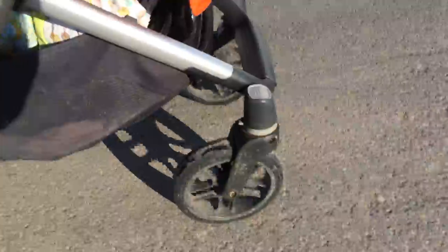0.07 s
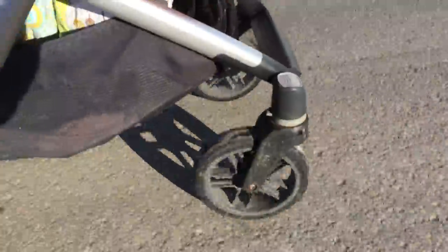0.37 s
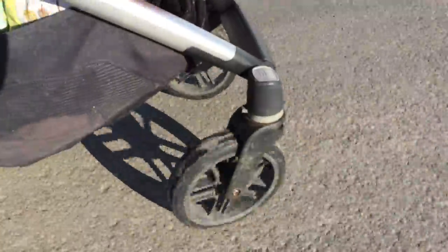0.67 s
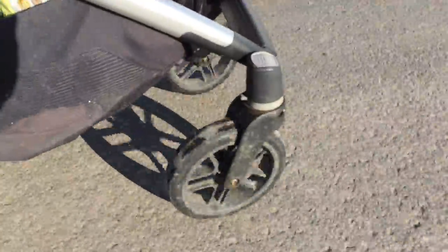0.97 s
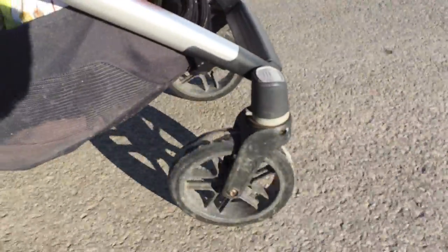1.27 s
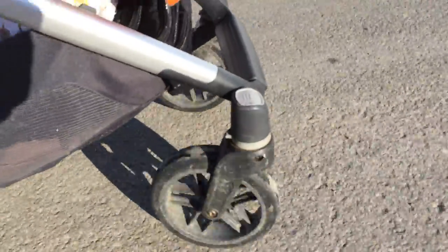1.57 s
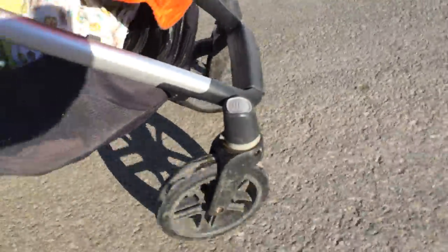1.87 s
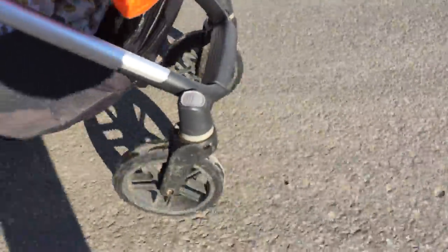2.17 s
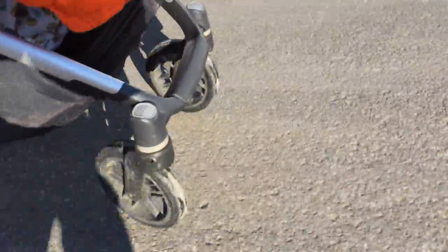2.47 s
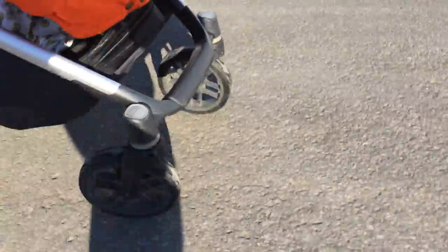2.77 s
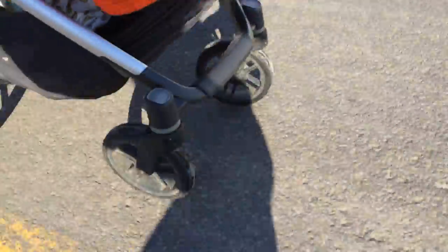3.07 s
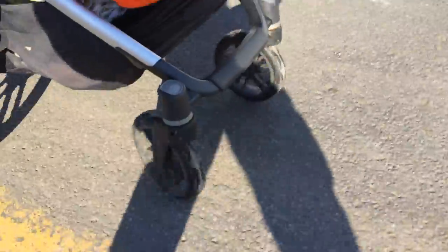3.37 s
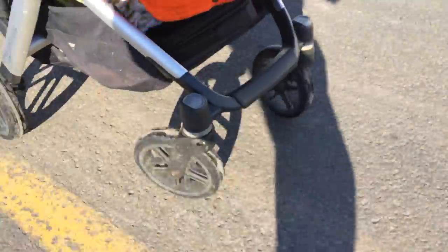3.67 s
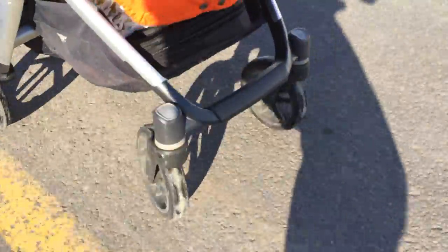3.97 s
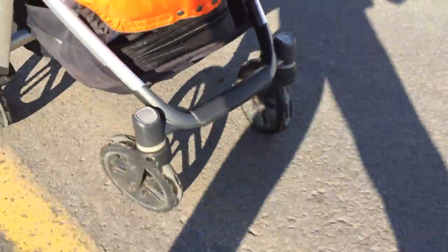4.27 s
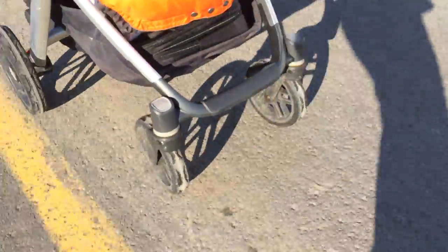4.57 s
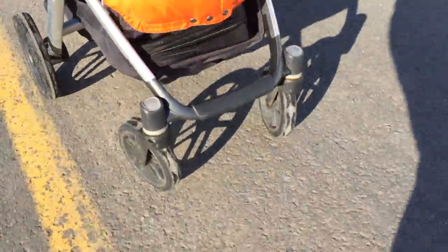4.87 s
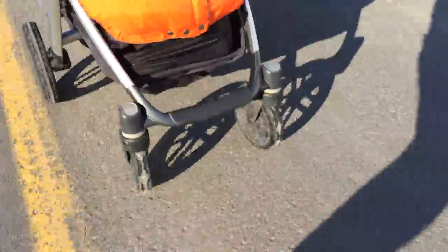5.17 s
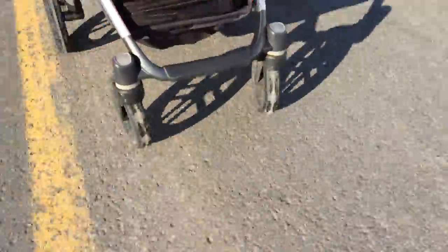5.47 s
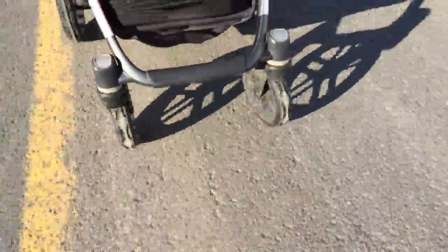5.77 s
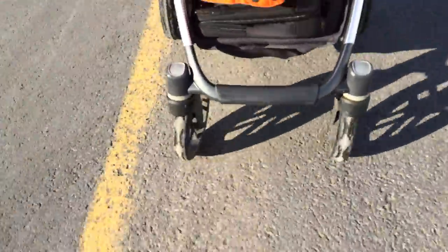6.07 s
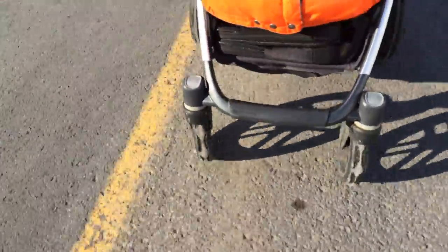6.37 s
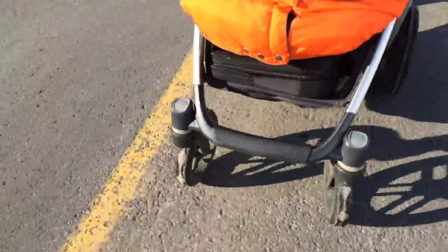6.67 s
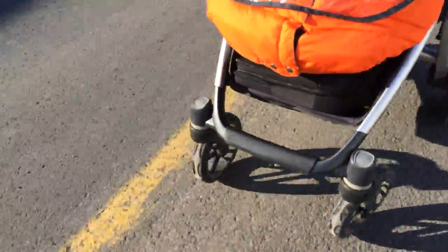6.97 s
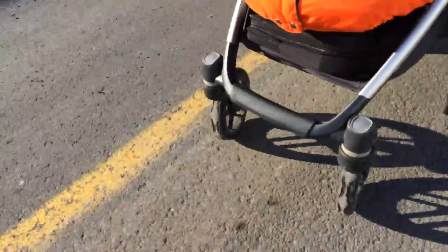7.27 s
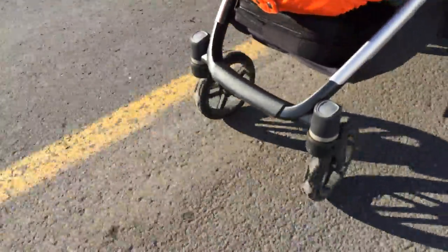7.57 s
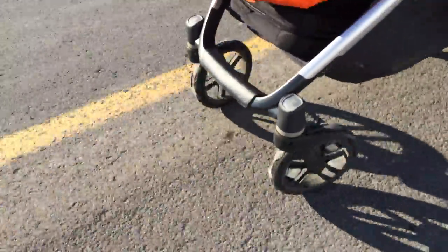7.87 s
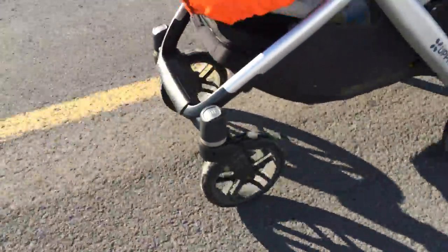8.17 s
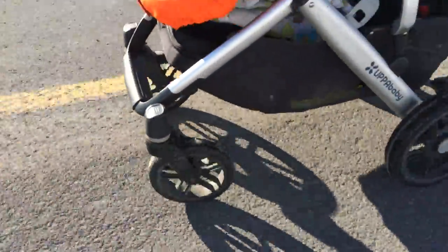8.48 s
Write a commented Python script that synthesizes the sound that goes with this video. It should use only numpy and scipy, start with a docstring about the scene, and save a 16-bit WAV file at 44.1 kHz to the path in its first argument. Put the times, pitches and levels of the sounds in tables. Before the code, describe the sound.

A stroller rolls over coarse asphalt outdoors for almost nine seconds, with the microphone low beside the front wheels. From the start, hard tyres make a juddering, gritty crackle over a soft rustle and uneven low rumble. Small stones snap and tick through the plastic wheels and frame throughout. Wind buffets the microphone, building at about 0.5 seconds into loud, rasping gusts that last until 2 seconds, then easing into short puffs. From 3 to 4.5 seconds the crunch grows stronger, with sharper clicks and several light swivel wheel knocks, the clearest near 4.4 seconds. A low wind thump hits just before 5 seconds, and more puffs follow around 5.5 and from 6 to 6.6 seconds. The grit crunches hardest near 8 seconds, with a couple of faint knocks, and the wind swells again from 8.3 seconds to the end.

```python
"""A stroller rolls over coarse, gritty asphalt, with a phone held low beside its front wheels.
Its hard tyres rustle, rumble and crush grit, surging with each stride, and snap over small stones.
Each tick sounds through the plastic wheels and frame, and now and then a caster (swivel wheel) knocks.
A gusty breeze buffets the microphone opening, louder and brighter as the air speeds up,
and the phone holds down the loudest peaks."""
import sys
import numpy as np
from scipy import signal
from scipy.fft import rfft, irfft
from scipy.io import wavfile
from scipy.ndimage import uniform_filter1d, minimum_filter1d, map_coordinates

SR = 44100
rng = np.random.default_rng(int(sys.argv[2]) if len(sys.argv) > 2 else 0)


def output_pcm(signal):
    """Save a mono or channel-first signal as 16-bit PCM at the path in sys.argv[1].

    Samples are clipped to [-1, 1] before scaling.
    """
    pcm = np.clip(np.atleast_2d(signal).T, -1, 1) * 32767
    wavfile.write(sys.argv[1], SR, np.round(pcm).astype(np.int16))


N = 384111

# How much fine grit lies under the tyres: time_s, level_db
GRIT_LEVELS = [(0.08, -45.5), (0.3, -52), (0.57, -45.5), (0.75, -49), (0.86, -45.5), (1.0, -49),
               (1.06, -65.5), (1.2, -52), (1.35, -48), (1.54, -47), (1.63, -50.5), (1.82, -48), (2.35, -46),
               (2.7, -47.5), (3.05, -43), (3.27, -50), (3.45, -44), (3.7, -41), (4.0, -41), (4.25, -44),
               (4.7, -48), (4.82, -43.5), (5.1, -50.5), (5.35, -43), (5.6, -45), (5.7, -44.5), (5.78, -43),
               (6.35, -48.5), (6.5, -47.5), (6.62, -53), (6.75, -48), (7.1, -47), (7.5, -48), (7.9, -37.5),
               (8.15, -41.5), (8.5, -52), (8.7, -50)]
# Walking pace: time_s, strides_per_s
WALKING_PACE = [(4.0, 2.0), (5.5, 2.44)]
# Clean patches of asphalt, where the crunch dips: middle_s, length_s
CLEAN_PATCHES = [(0.22, 0.021), (0.284, 0.014), (0.41, 0.022), (0.78, 0.026), (1.597, 0.037), (1.665, .025),
                 (2.112, 0.028), (2.494, 0.01), (2.634, 0.015), (2.698, 0.018), (3.28, 0.015),
                 (3.413, 0.011), (3.531, 0.0097), (3.59, 0.005), (3.884, 0.0092), (3.948, 0.0031),
                 (4.198, .018), (4.253, 0.02), (4.386, .016), (4.747, 0.011), (4.978, 0.019),
                 (5.111, 0.016), (5.349, 0.0088), (5.465, 0.02), (5.584, 0.028), (5.829, 0.022),
                 (6.076, 0.021), (6.41, 0.028), (6.489, 0.0065), (6.843, 0.04), (6.917, 0.017),
                 (7.258, 0.013), (7.507, 0.013), (7.816, 0.022), (7.99, 0.029), (8.229, 0.026),
                 (8.359, .014)]
# How fast the wheels shake: time_s, beats_per_s
JUDDER_RATES = [(0.1, 15.8), (1.2, 16.2), (2.4, 15.21), (3.6, 16.15), (4.8, 16.52), (6.0, 16.01),
                (7.2, 16.47), (8.6, 16.6)]
# Tone of the tread rubbing the road: pitch_hz, level_db
TREAD_TONE = [(150, 3.5), (320, -5), (520, 2.5), (700, -1), (1000, 0.5), (1600, -3.5), (3000, -15.5),
              (6000, -25.5), (15000, -25.5)]
# Deep rumble of the tyres and of slow air: time_s, level_db
RUMBLE_LEVELS = [(0.15, -27.5), (0.55, -26), (1.15, -39), (2.1, -51), (2.5, -27.5), (3.0, -37.5),
                 (3.55, -35.5), (4.0, -31.5), (4.35, -41), (4.65, -44), (4.87, -15), (5.0, -52), (5.2, -52),
                 (5.45, -33), (5.85, -40.5), (6.2, -34), (6.55, -26), (6.75, -39.5), (7.0, -40),
                 (7.4, -30.5), (7.75, -30.5), (8.15, -32.5), (8.3, -24), (8.65, -25)]
# Tone of that rumble: pitch_hz, level_db
RUMBLE_TONE = [(25, -23.5), (50, 1.5), (85, 6.5), (135, -2.5), (220, -7), (330, -34), (520, -18.5),
               (700, -52), (1500, -77)]
# Strength of the breeze at the microphone: time_s, level_db
BREEZE_LEVELS = [(0.08, -27), (0.35, -29), (0.55, -26), (0.8, -17), (1.0, -14), (1.22, -19), (1.42, -16.5),
                 (1.6, -19), (1.8, -17), (2.0, -21), (2.17, -31), (2.55, -22), (2.74, -31), (3.0, -32),
                 (3.85, -30), (4.0, -28), (4.5, -38), (5.15, -45), (5.36, -28), (5.54, -22), (5.63, -40),
                 (5.9, -38), (6.25, -25.5), (6.48, -38), (6.8, -37), (7.5, -33.5), (8.18, -35.5),
                 (8.3, -24), (8.5, -27), (8.7, -25.5)]
# Short, strong puffs of air (faster eddies sound brighter): peak_s, level_db, length_s, eddy_rate_hz
AIR_PUFFS = [(0.169, -16, 0.011, 398.7), (0.401, -8, 0.012, 456.4), (0.427, -14.5, 0.013, 418),
             (0.479, -17, 0.01, 641), (0.569, -12, 0.0055, 847), (0.609, -7, 0.013, 559),
             (0.635, -17.5, 0.01, 760), (0.689, -11, 0.016, 673), (0.735, -14, 0.011, 901.5),
             (0.759, -6.5, 0.0085, 509.2), (0.78, -8.5, 0.0079, 559), (0.824, -5, 0.011, 516.5),
             (0.845, -14.5, 0.0068, 946), (0.899, -7, 0.0057, 1304), (0.955, -13, .004, 2087),
             (0.975, -12, 0.0075, 1843), (1.019, -12.5, 0.0089, 1659), (1.078, -13, 0.0052, 1409),
             (1.111, -12.5, 0.0036, 1182), (1.159, -15.5, 0.018, 1243), (1.199, -12, 0.0034, 1347),
             (1.271, -8.5, 0.0064, 946), (1.357, -10, 0.013, 599), (1.385, -14.5, 0.0077, 901),
             (1.443, -9, 0.0089, 603), (1.466, -10, 0.013, 1002), (1.522, -13.5, 0.024, 523.4),
             (1.679, -13, 0.018, 518.7), (1.85, -14.5, 0.0078, 999.4), (1.882, -15, .012, 1412),
             (1.93, -15, .014, 696.5), (1.9745, -9, 0.0054, 1000), (2.008, -18.5, 0.009, 941.6),
             (2.04, -13.5, 0.0042, 939), (2.065, -13, 0.012, 678.5), (2.139, -14, 0.009, 474.6),
             (2.198, -21.5, 0.011, 545.3), (2.255, -13.5, 0.011, 380.8), (2.303, -25, 0.021, 478),
             (2.384, -19, .006, 500), (2.414, -13, 0.015, 449.6), (2.456, -13.5, 0.0097, 896),
             (2.539, -9, 0.0088, 994.7), (2.6, -17, 0.011, 552.3), (2.653, -14.5, 0.023, 1471),
             (2.802, -13, 0.014, 420), (2.947, -18.5, 0.013, 470), (3.079, -13, 0.0069, 682),
             (3.182, -21, 0.0082, 480.4), (3.206, -22, 0.0084, 477), (3.227, -17, 0.0073, 518),
             (3.284, -18.5, 0.019, 460), (3.419, -22, 0.019, 428), (3.968, -15.5, 0.0096, 559.8),
             (4.168, -22.5, 0.014, 251.6), (4.365, -34.5, .012, 901), (4.583, -29.5, 0.012, 845),
             (4.739, -22.5, 0.018, 487.7), (4.821, -8.5, .01, 760.4), (4.85, -19.5, 0.02, 601),
             (4.885, -7, 0.012, 758), (4.903, -17.5, 0.0085, 1096), (5.28, -20.5, .006, 740.6),
             (5.384, -12, 0.0081, 302.8), (5.419, -7.5, 0.0072, 622.7), (5.443, -17, 0.015, 577),
             (5.486, -15.5, 0.0042, 802.5), (5.507, -11, 0.021, 600.5), (5.561, -12.5, .005, 1240),
             (5.571, -16.5, 0.0093, 767), (5.601, -21, 0.0045, 795), (5.72, -24, 0.015, 646.3),
             (5.757, -24.5, 0.0091, 651), (6.055, -18.5, 0.024, 530.8), (6.098, -9, 0.0068, 648),
             (6.125, -15, 0.022, 678), (6.238, -8, .012, 1495), (6.27, -12.5, .012, 1285),
             (6.325, -15.5, 0.0063, 854), (6.346, -19.5, 0.014, 602), (6.382, -13, 0.0078, 464.6),
             (6.526, -15, 0.0049, 597.8), (6.544, -11.5, 0.012, 624.5), (6.607, -10, 0.0042, 901.4),
             (6.623, -11, 0.015, 1342), (6.76, -24, .014, 449), (6.931, -26, 0.0097, 516.6),
             (6.99, -25, 0.018, 280.4), (7.048, -27, .022, 483.7), (7.115, -28, 0.014, 639),
             (7.22, -15, .012, 218), (7.281, -22, 0.015, 493.2), (7.43, -15, 0.009, 449.8),
             (7.445, -17, 0.0064, 1102), (7.484, -18, 0.018, 578), (7.546, -23, 0.015, 580.4),
             (7.924, -25, 0.022, 690.7), (8.294, -13, 0.022, 558), (8.414, -14, 0.0051, 1198)]
# Long gusts that swell into a rasp: peak_s, level_db, length_s, eddy_rate_hz
LONG_GUSTS = [(0.945, -10, 0.075, 1451), (1.06, -15, 0.071, 951.3), (1.295, -12, 0.0454, 901.8),
              (1.48, -13.5, 0.085, 831.8), (1.68, -16, 0.048, 1250), (1.795, -12.5, .115, 1418),
              (8.39, -20, .08, 701.6), (8.62, -24, 0.14, 720)]
# Larger stones under a wheel: peak_s, level_db, length_s, hardness_db_per_octave, ring_hz
BIG_STONES = [(0.093, -39.5, 0.0099, 0, 2250), (0.258, -33, 0.0017, -3, 5700),
              (0.33, -37.5, 0.0089, -2, 8000), (0.44, -36.5, 0.0094, 2.5, 1600),
              (0.5, -33.5, 0.0022, 4.5, 6750), (0.508, -38, .002, 6, 6750), (0.566, -40, 0.012, 8, 5200),
              (0.584, -30, 0.0032, -7, 5700), (0.625, -30.5, 0.003, -0.5, 9100),
              (0.694, -33.5, 0.0053, 6.5, 3080), (0.89, -38.5, 0.0027, 3, 5540),
              (0.94, -30, 0.0024, 4, 5030), (1.019, -32.5, 0.0017, 5.5, 4836),
              (1.322, -35.5, 0.006, 1, 7540), (1.439, -39, 0.0021, 7, 4977),
              (1.482, -27.5, 0.0046, 2.5, 3564), (1.552, -40, 0.0064, 6, 5530),
              (1.838, -42.5, 0.0019, 13.5, 3065), (1.882, -43, 0.0017, -6, 3990),
              (2.005, -31.5, 0.0065, -1, 3517), (2.156, -24, 0.0017, 0, 4964),
              (2.241, -20.5, 0.0019, 2.5, 2097), (2.329, -39, 0.0062, 5, 4590),
              (2.526, -18.5, 0.0034, 0, 3670), (2.667, -32, 0.0017, -3, 3616),
              (2.78, -34, 0.0088, -1.5, 4200), (2.856, -25, 0.0013, 0, 2400),
              (2.908, -24.5, 0.0033, -1.7, 2400), (2.941, -38, .0018, 6, 4463),
              (2.982, -34.5, .002, -7, 5987), (3.048, -25.5, 0.0022, 1.5, 4680),
              (3.064, -38, 0.0064, 4, 7004), (3.082, -34, 0.0017, 6.5, 9730),
              (3.099, -41, 0.0028, 0.5, 6500), (3.388, -29, 0.0019, -2.5, 4984),
              (3.43, -27.5, 0.0064, -6, 3030), (3.504, -30, 0.0021, 1, 3964),
              (3.561, -22, 0.0025, -0.5, 3636), (3.597, -34, 0.0018, -7, 4970),
              (3.611, -27, 0.0035, 1, 3520), (3.708, -33, 0.0039, 5.5, 7150), (3.909, -20, .002, 0, 1997),
              (3.915, -19.5, 0.0033, -1.5, 3527), (3.935, -26, 0.0025, 1.5, 2767),
              (3.966, -37, 0.013, 6.5, 6455), (4.03, -20, 0.003, 0.5, 3480), (4.041, -22, 0.0015, -1, 5000),
              (4.047, -20, 0.002, 1, 1945), (4.074, -32, 0.0017, 1, 5500), (4.09, -31, 0.0019, -3, 4520),
              (4.156, -34.5, 0.022, -3.5, 3440), (4.308, -32.5, 0.0038, 0.5, 7620),
              (4.361, -33, .002, 0, 4020), (4.404, -32.5, 0.0051, -5, 1099), (4.4128, -19, 0.0023, 1, 3400),
              (4.455, -34, 0.012, -1, 7010), (4.499, -23.5, 0.0017, -0.5, 6260),
              (4.5347, -23.5, 0.0015, 3, 6620), (4.658, -32, 0.0076, -3, 3604),
              (4.779, -33, 0.01, -3, 3606), (4.798, -30, .002, 2, 4496), (4.839, -30, 0.0031, -5, 2000),
              (4.867, -25.5, 0.0018, -2, 5340), (4.897, -29.5, 0.0072, -3, 3676),
              (5.002, -31, 0.0023, -2, 3500), (5.015, -33, 0.0065, -1, 4070),
              (5.031, -32, 0.0027, 0.5, 4080), (5.212, -31.5, 0.0042, -0.5, 5160),
              (5.257, -29.5, 0.0028, -5, 3184), (5.27, -30, 0.002, 2, 11990),
              (5.372, -30, 0.0036, -4, 2610), (5.3803, -18.5, 0.0052, 0, 3030),
              (5.399, -25, .006, -2, 2611), (5.502, -30.5, 0.0036, -2, 2650), (5.555, -33, .0015, -4, 5992),
              (5.732, -34, .005, -5, 2904), (5.759, -42.5, 0.0052, 5, 6520),
              (5.815, -30.5, 0.0034, -2.5, 2429), (5.868, -19.5, 0.0027, 0.5, 996),
              (6.007, -25.5, 0.0023, -3, 2192), (6.025, -34.5, 0.0044, 1, 4520),
              (6.171, -32, 0.015, 2.5, 3474), (6.231, -34, 0.0019, -11.5, 5030),
              (6.255, -31, .002, -10, 3764), (6.54, -30, 0.002, -5, 8044),
              (6.549, -27.5, 0.0028, -5.5, 3235), (6.676, -41, 0.003, 6, 5497),
              (6.717, -33, .002, -4.5, 4977), (6.762, -27.5, 0.0031, -1.5, 5300),
              (6.816, -37.5, 0.0086, -2, 4490), (6.866, -26, 0.0021, -3.5, 3550),
              (6.889, -27, 0.0031, 1, 2410), (7.147, -35, 0.0021, -1, 6055), (7.177, -25, 0.0026, 3, 2050),
              (7.175, -21.5, 0.0057, 2.5, 8030), (7.221, -30, 0.0022, -3.5, 5010),
              (7.359, -32.5, 0.0028, -3, 1200), (7.409, -25, 0.0024, -1, 4200),
              (7.421, -30, .012, 0.5, 1595), (7.658, -23, 0.0022, -1, 4620), (7.704, -34, 0.0018, 0, 5010),
              (7.727, -24.5, 0.003, -2.5, 1370), (7.751, -35, .002, -1, 3990),
              (7.783, -19.5, 0.0023, 2, 5170), (7.824, -27, 0.0048, 0, 5220),
              (7.876, -22.5, 0.0022, -1.5, 6380), (7.908, -29, 0.0046, 0, 4330),
              (7.919, -26, 0.003, 1, 4426), (8.011, -31.5, 0.0061, -5, 2300), (8.071, -28, .002, 4, 4970),
              (8.115, -36, 0.0028, -6, 5040), (8.128, -34, 0.0021, 3, 5480),
              (8.246, -26.5, 0.003, -2, 1240), (8.2536, -19.5, 0.0045, -0.5, 2892),
              (8.392, -29, 0.004, -5.5, 6760)]
# Tone that the wheels and frame give each tick: pitch_hz, level_db
WHEEL_TONE = [(100, 2.5), (520, -11), (740, -7), (880, 2.5), (1200, 1.5), (1550, -5), (2000, -5.5),
              (3500, -7.5), (4300, -11.5), (6300, -8.5), (8200, -12.5), (12000, -17.5), (15300, -21)]
# Jolts that knock a caster in its fork: start_s, level_db, pitch_ratio
CASTER_JOLTS = [(3.4279, -22, 1.14), (3.5605, -32, 1.1), (3.9128, -20, 1.02), (4.0293, -25, 1.02),
                (4.4108, -14, 1.0), (5.8675, -27, 0.94), (6.866, -37, 1.02), (7.727, -27, 1.14),
                (8.246, -25, 1.02)]
# Notes a caster rings with, and their time to fade by 60 dB: pitch_hz, level_db, fade_s
CASTER_NOTES = [(1073, -13.5, 0.029), (1199.3, -1, 0.02), (2390, -19, 0.051), (3440, -9, 0.0054)]


def undb(db):
    """Turn decibels into a gain."""
    return 10 ** (np.asarray(db) / 20)


def curves(table):
    """Join the rows of a table into one curve per column; the first column is the time."""
    times, *columns = np.transpose(table)
    return [np.interp(np.arange(N) / SR, times, column) for column in columns]


def wander(rate_hz):
    """A random curve, about 1 in size, that changes rate_hz times a second."""
    points = rng.standard_normal(N // 8)
    curve = np.interp(np.arange(N) * rate_hz / SR, np.arange(len(points)), points)
    return curve / np.sqrt(np.mean(curve ** 2))


def steady(noise, span_s):
    """Even out a noise so that each stretch of span_s has a strength of about 1."""
    span = max(int(span_s * SR), 2)
    power = uniform_filter1d(uniform_filter1d(noise ** 2, span), span)
    return noise / np.sqrt(np.abs(power) + 1e-9)


def burst(peak_s, length_s, lean):
    """Sample numbers and outline of one swell; with lean above 0 it rises faster than it falls."""
    i = np.arange(max(int((peak_s - 2 * length_s) * SR), 0), min(int((peak_s + 3 * length_s) * SR), N))
    t = (i / SR - peak_s) / length_s
    return i, np.exp2(-2 * (t / (1 + lean * np.tanh(2 * t))) ** 2)


def moments(per_s):
    """Sample numbers of loosely spaced events, with three random numbers for each."""
    draws = rng.standard_normal((1024, 4))
    times = (np.arange(len(draws)) + .5 + .5 * draws[:, 0]) / per_s
    inside = (times > 0) & (times < N / SR)
    return (times[inside] * SR).astype(int), draws[inside, 1:].T


def with_tone(sound, tone, size=1024):
    """Filter a sound with the shortest ring that has the tone in a table."""
    hz, db = np.transpose(tone)
    gains = undb(np.interp(np.log(np.fft.rfftfreq(size, 1 / SR) + 1), np.log(hz), db))
    cepstrum = irfft(np.log(gains))
    cepstrum[1:size // 2] *= 2  # folding this in half puts the ring after the hit, never before
    cepstrum[size // 2 + 1:] = 0
    ring = irfft(np.exp(rfft(cepstrum)))
    return signal.fftconvolve(sound, ring / np.linalg.norm(ring))[:N]


def crunch_level():
    """Crunch level in dB: it follows the grit, dips on clean patches and swells with each stride."""
    first_stride_s, stride_db, dip_db = 0.44, 1, -9
    db, = curves(GRIT_LEVELS)
    pace, = curves(WALKING_PACE)
    strides = np.cumsum(pace) / SR - first_stride_s * pace[0]
    for middle_s, length_s in CLEAN_PATCHES:
        i, outline = burst(middle_s, length_s, lean=0)
        db[i] += dip_db * outline
    return db + stride_db * np.cos(2 * np.pi * strides)


def judder(depth_db=2):
    """Shaking wheels press and ease: the load, from -1 to 1, and the dB it adds to the crunch."""
    rate, = curves(JUDDER_RATES)
    load = np.cos(2 * np.pi * np.cumsum(rate) / SR)
    return load, depth_db * load


def cracks(per_s, spread_db, crumble_s):
    """Grains break at random moments with unequal force, each in a tiny burst of noise."""
    breaks = rng.random(N) < per_s / SR
    energy = breaks * undb(spread_db * rng.standard_normal(N)) ** 2
    decay = np.exp(-2 / (crumble_s * SR))
    outline = np.sqrt(signal.filtfilt([1 - decay], [1, -decay], energy + 1e-12, padlen=0))
    return outline * rng.standard_normal(N)


def harden(force, db_per_octave, flicker_db):
    """Hard grains tick more sharply: tilt the tone around 4 kHz and let each octave flicker."""
    octaves = np.arange(-3, 3)
    place = np.log2((np.fft.rfftfreq(N, 1 / SR) + 1) / 4000)
    spectrum = rfft(force)
    out = np.zeros(N)
    for octave in octaves:
        band = irfft(spectrum * np.interp(place, octaves, octaves == octave), N)
        out += band * undb(db_per_octave * octave + flicker_db * wander(180))
    return out


def grit(clump_db=4.5, patchy_db=2.04):
    """Fine grit crackles in clumps, denser where it lies thick, louder and sharper at each shake."""
    crunch_db = crunch_level()
    load, judder_db = judder()
    grains_per_s = 420 * undb(1.5 * (crunch_db - crunch_db.mean()))
    grains = cracks(grains_per_s, spread_db=3.5, crumble_s=0.00081)
    crackle = steady(grains * undb(clump_db * wander(110)), span_s=.05)
    db = crunch_db - 1 + judder_db + patchy_db * wander(14)
    return harden(crackle * undb(db), db_per_octave=-0.068 + 0.51 * load, flicker_db=1.6)


def frame(force, scatter_db, fade_s, cutoff_hz):
    """Each tick sounds through the wheel, with a short, duller scatter off road, basket and frame."""
    fade = undb(-60 * np.arange(4096) / SR / fade_s) ** 2
    energy = np.abs(signal.fftconvolve(force ** 2, fade / fade.sum())[:N])
    scatter = np.sqrt(energy) * rng.standard_normal(N)
    dull_scatter = signal.lfilter(*signal.butter(2, cutoff_hz, fs=SR), scatter)
    return with_tone(force + undb(scatter_db) * dull_scatter, WHEEL_TONE)


def tread_rustle(level_db=-47.5, follow=0.25):
    """The tread rubs the asphalt with a soft rustle that only partly follows the crunch."""
    crunch_db = crunch_level()
    rub = with_tone(rng.standard_normal(N), TREAD_TONE)
    return rub * undb(level_db + follow * (crunch_db - crunch_db.mean()) + 2 * wander(40))


def rumble(thump_db=-16.5, lowest_hz=39):
    """Tyres drum on the rough road, slow air rolls past the phone and strong puffs thump it."""
    db, = curves(RUMBLE_LEVELS)
    puff_strength, _ = swells(AIR_PUFFS)
    strength = np.hypot(undb(db), undb(thump_db) * puff_strength)
    drumming = with_tone(rng.standard_normal(N), RUMBLE_TONE, size=4096)
    uneven = steady(drumming * undb(6.9 * wander(60)), span_s=0.095)
    return signal.sosfilt(signal.butter(3, lowest_hz, "high", fs=SR, output="sos"), uneven * strength)


def swells(table):
    """Blend puffs or gusts into one strength and one eddy rate, led by the strongest."""
    power = np.full(N, 1e-14)
    weighted_hz = power * table[0][3]
    for peak_s, db, length_s, eddy_hz in table:
        i, outline = burst(peak_s, length_s, lean=0.1162)
        share = (undb(db) * outline) ** 2
        power[i] += share
        weighted_hz[i] += share * eddy_hz
    return np.sqrt(power), weighted_hz / power


def eddy_rate(db, calm_hz=230.1, gust_hz=1902):
    """Eddies are little whirls of air; the stronger the wind, the faster they pass."""
    return calm_hz + gust_hz * undb(db) ** .72


def eddies(gain, eddy_hz, bass_tilt, steepness, swirl_db, swirl_pitch, span_s):
    """A pattern of eddies drifts past the microphone; faster air plays the same pattern higher."""
    pattern_hz = 1000
    ratio = np.fft.rfftfreq(N, 1 / SR) / pattern_hz
    # big eddies break into weaker small ones, and the smallest die out
    falloff = np.sqrt((1 + (ratio * bass_tilt) ** 2) * (1 + ratio ** steepness))
    pattern = irfft(rfft(rng.standard_normal(N)) / falloff, N)
    swirl = wander(170)
    travel = np.cumsum(eddy_hz * np.exp(swirl_pitch * swirl) / pattern_hz)
    pressure = map_coordinates(pattern, [travel % (N - 1)], order=3, mode="nearest")
    return gain * steady(pressure * undb(swirl_db * swirl), span_s)


def small_puffs(breeze_db):
    """Random rows like AIR_PUFFS that take their strength and brightness from the breeze."""
    i, (strength, length, speed) = moments(per_s=18)
    db = breeze_db[i] - 3 + 2 * strength
    length_s = .01 * np.exp(.3 * length)
    eddy_hz = eddy_rate(breeze_db[i]) * 1.15 * np.exp(.12 * speed)
    return list(zip(i / SR, db, length_s, eddy_hz))


def wind(lowest_hz=89, hoot_hz=517, hoot_db=-19.5):
    """Moving air hits the microphone opening, which hoots faintly and lets little deep bass in."""
    db, = curves(BREEZE_LEVELS)
    breeze = eddies(undb(db - 1.5), eddy_rate(db), bass_tilt=6.0, steepness=12.0,
                    swirl_db=3.0, swirl_pitch=.15, span_s=0.073)
    gusts = eddies(*swells(LONG_GUSTS), bass_tilt=6.7, steepness=8.9,
                   swirl_db=3.5, swirl_pitch=.11, span_s=0.024)
    puffs = eddies(*swells(AIR_PUFFS + small_puffs(db)), bass_tilt=7.3, steepness=7.05,
                   swirl_db=6.5, swirl_pitch=.1, span_s=0.0073)
    air = breeze + gusts + undb(2.0) * puffs
    hoot = signal.lfilter(*signal.iirpeak(hoot_hz, Q=6, fs=SR), air)
    bass_cut = signal.butter(3, lowest_hz, "high", fs=SR, output="sos")
    return signal.sosfilt(bass_cut, air + undb(hoot_db) * hoot)


def small_stones():
    """Random rows like BIG_STONES, louder where the grit is thick and the tyres press hard."""
    i, (strength, length, brightness) = moments(per_s=10)
    brightness = np.maximum(brightness, -1)  # never as dull as a knock
    _, judder_db = judder()
    db = (crunch_level() + judder_db)[i] + 7.5 + 2 * strength
    length_s = 0.0013 * np.exp(0.13 * length)
    hardness = -3.0 + 5.5 * brightness
    ring_hz = 3750 * np.exp(.5 * brightness)
    return list(zip(i / SR, db, length_s, hardness, ring_hz))


def stones(ring_db=2.5, ring_width=0.2, size=4096):
    """Each stone gives a tight, ragged burst of cracks, coloured by its own brief ring."""
    out = np.zeros(N + size)
    crumbs = steady(cracks(per_s=4000, spread_db=5, crumble_s=.0004), span_s=.0015)
    hz = np.fft.rfftfreq(2 * size, 1 / SR) + 1
    octave = np.clip(np.log2(hz / 4000), -3, 2)
    for peak_s, db, length_s, hardness, ring_hz in BIG_STONES + small_stones():
        i, outline = burst(peak_s, length_s, lean=0.54)
        outline = .62 * outline + .75 * outline ** 6  # the break is a sharp core inside the crunch
        ring = undb(ring_db) / (1 + 1j * (hz / ring_hz - ring_hz / hz) / ring_width)
        tone = undb(db - 5.5 + hardness * octave) * (1 + ring)
        out[i[0]:i[0] + size] += irfft(rfft(crumbs[i] * outline, 2 * size) * tone)[:size]
    return out[:N]


def caster_knocks(contact_s=0.0005):
    """A jolt sets the caster's few notes ringing, a little higher or lower each time."""
    out = np.zeros(N)
    t = np.arange(4096) / SR
    attack = 1 - np.exp(-t / contact_s)
    note_hz, note_db, fade_s = np.transpose(CASTER_NOTES)[:, :, None]
    for start_s, db, pitch_ratio in CASTER_JOLTS:
        detune, strength = rng.standard_normal((2, len(CASTER_NOTES), 1))
        hz = note_hz * pitch_ratio * (1 + 0.014 * detune)
        notes = undb(note_db + 1.336 * strength - 60 * t / fade_s) * np.sin(2 * np.pi * hz * t)
        start = int(start_s * SR)
        out[start:start + len(t)] += undb(db) * notes.sum(axis=0) * attack
    return out


def scene(start_s=0.0857, rise_s=0.0071):
    """Stroller and wind come in together after a moment of quiet."""
    fade_in = np.clip((np.arange(N) / SR - start_s) / rise_s + .5, undb(-68.5), 1)
    air_and_tyres = wind() + rumble() + tread_rustle()
    crunch = frame(grit() + stones(), scatter_db=-11.0, fade_s=0.12, cutoff_hz=4200)
    return (fade_in * (air_and_tyres + crunch + caster_knocks()))[None]


def record(dry):
    """The phone briefly turns down the loudest peaks and cuts the highest treble."""
    ceiling, hold_samples, top_hz = .7, 61, 15350
    needed_gain = ceiling / np.maximum(np.abs(dry), ceiling)
    gain = uniform_filter1d(minimum_filter1d(needed_gain, hold_samples), hold_samples)
    return signal.sosfilt(signal.ellip(8, .2, 80, top_hz, fs=SR, output="sos"), dry * gain)


dry = scene()
out = record(dry)
output_pcm(out)
```